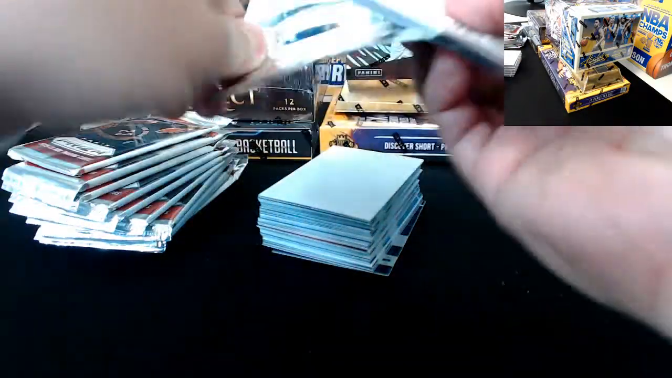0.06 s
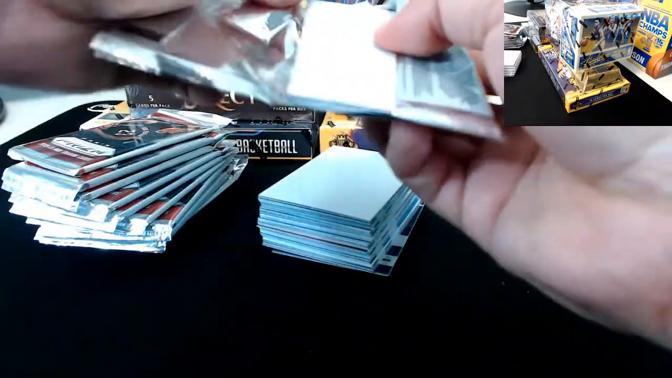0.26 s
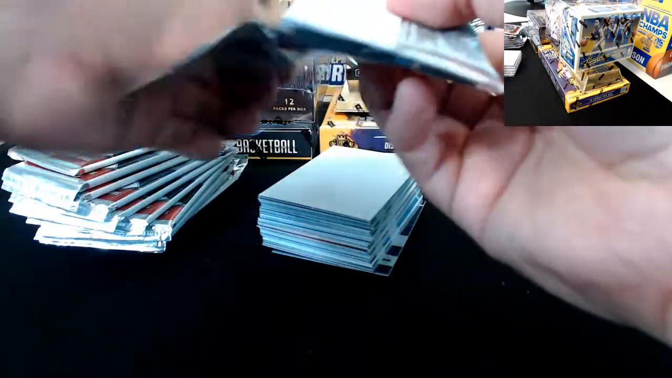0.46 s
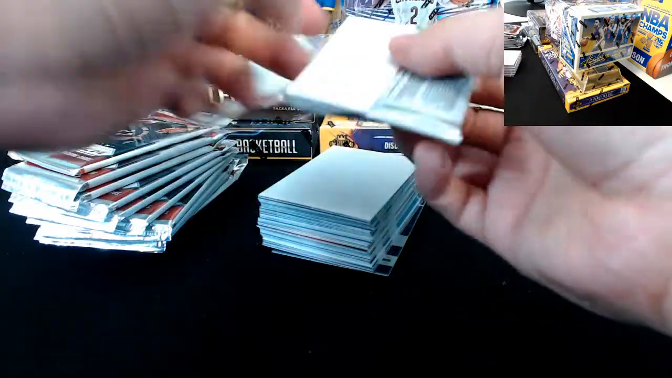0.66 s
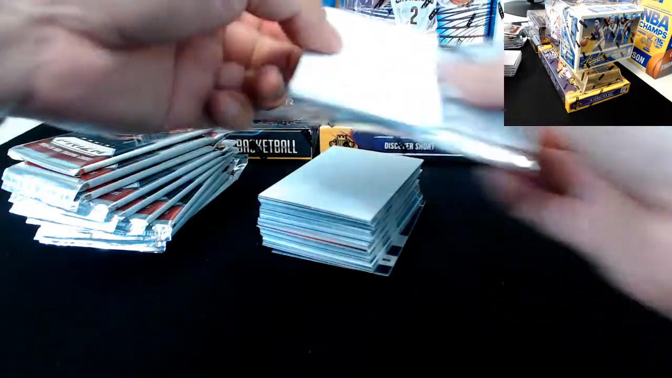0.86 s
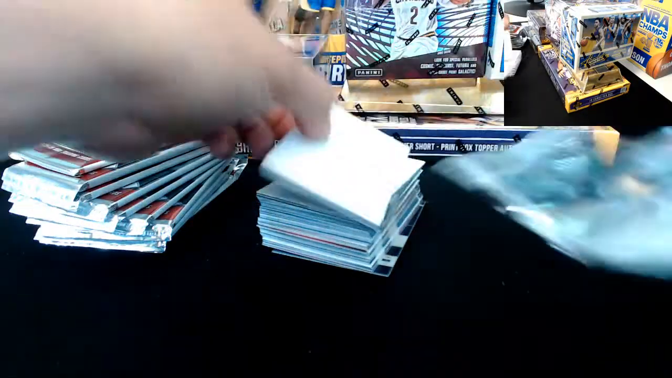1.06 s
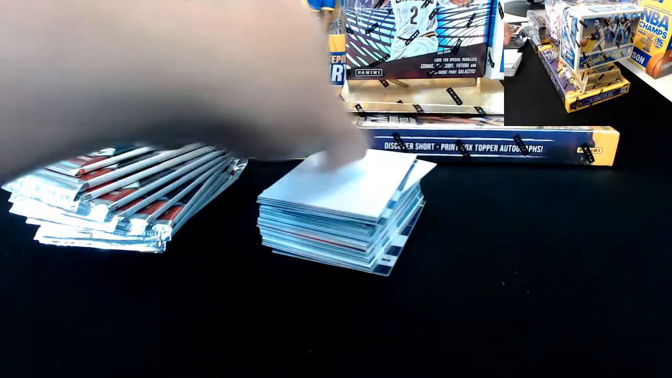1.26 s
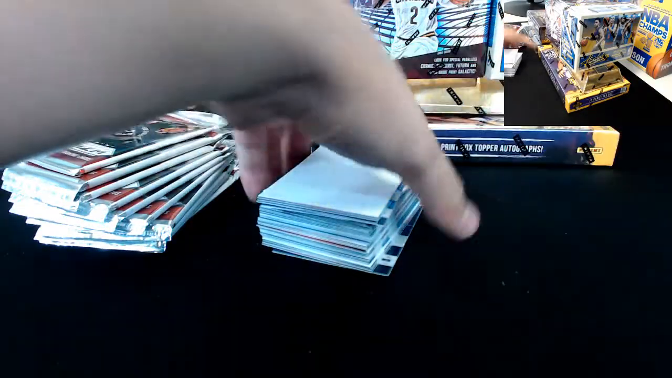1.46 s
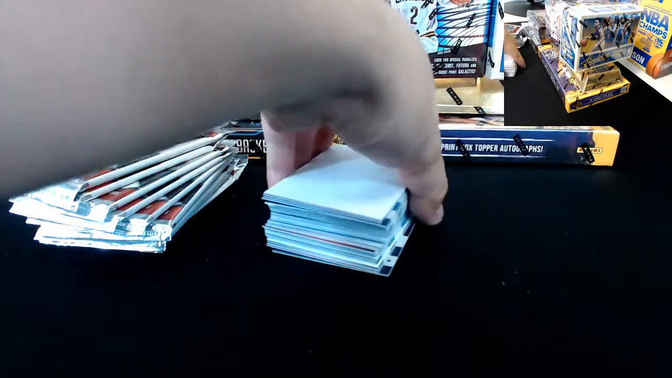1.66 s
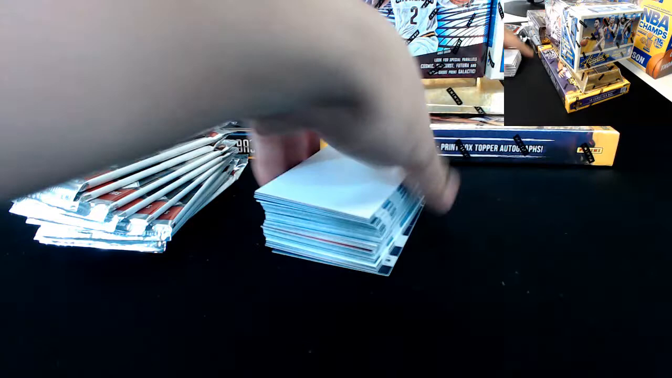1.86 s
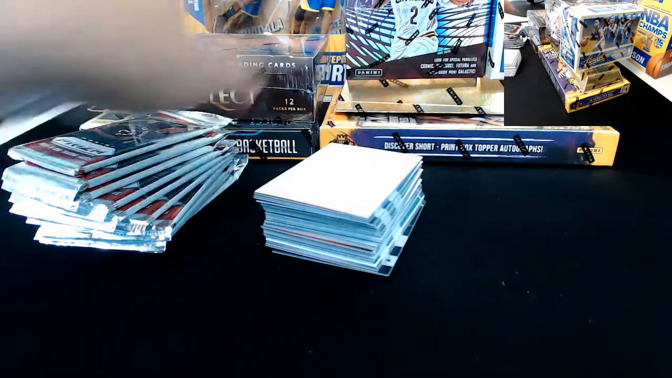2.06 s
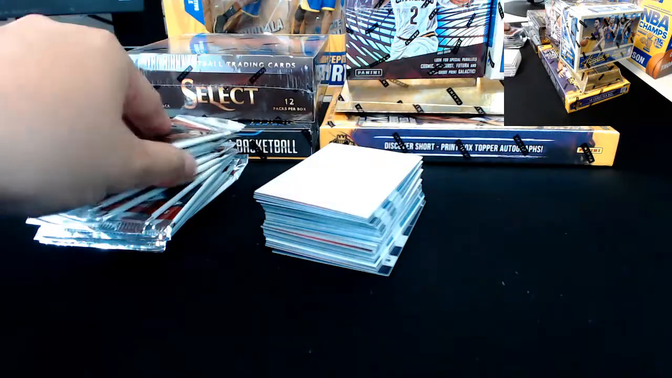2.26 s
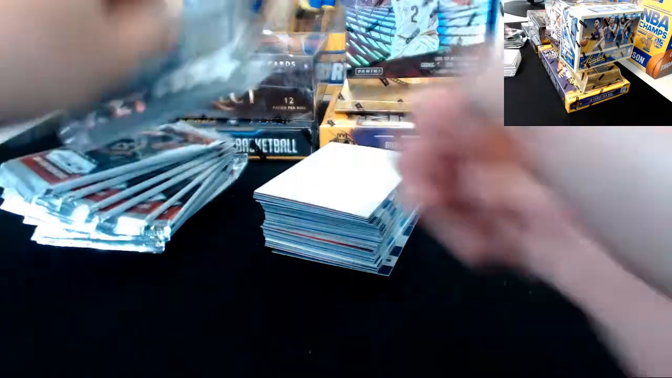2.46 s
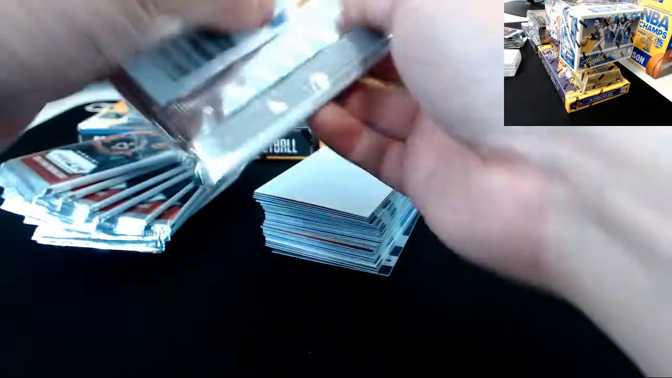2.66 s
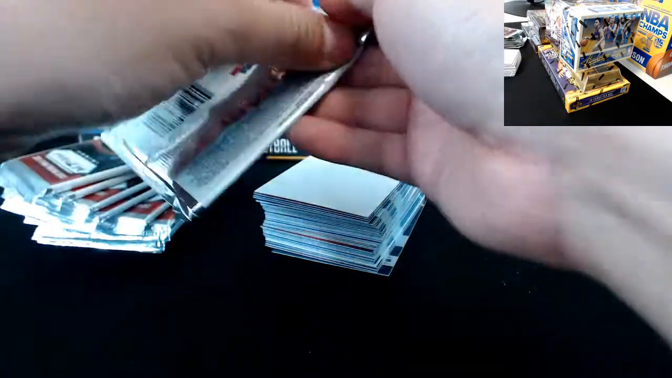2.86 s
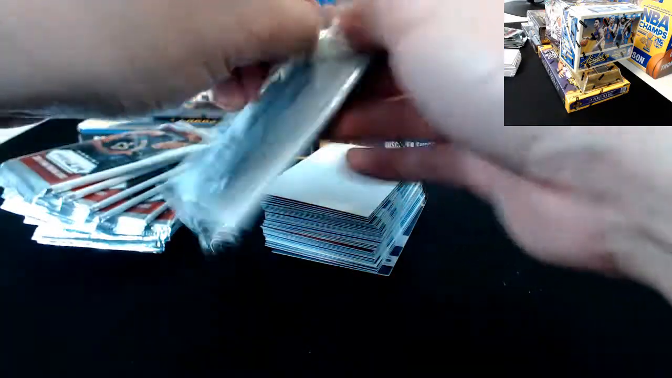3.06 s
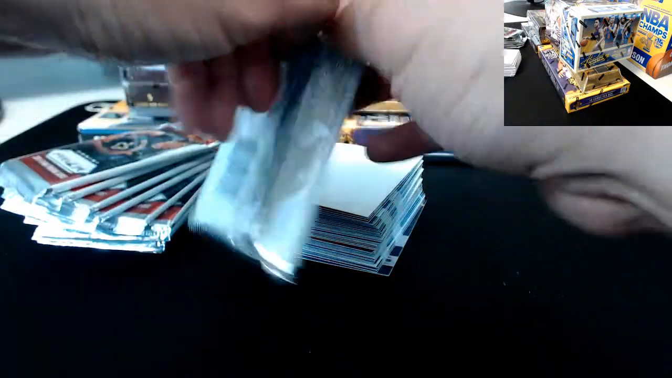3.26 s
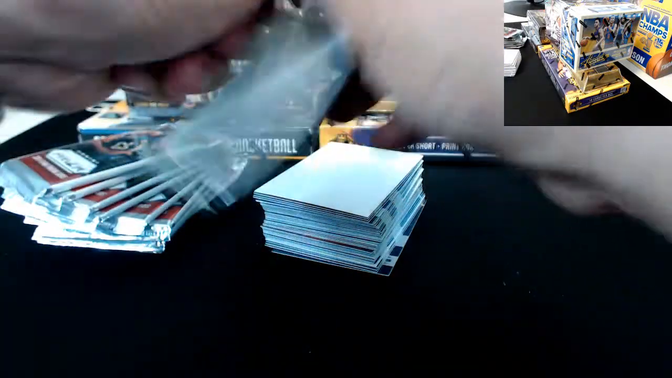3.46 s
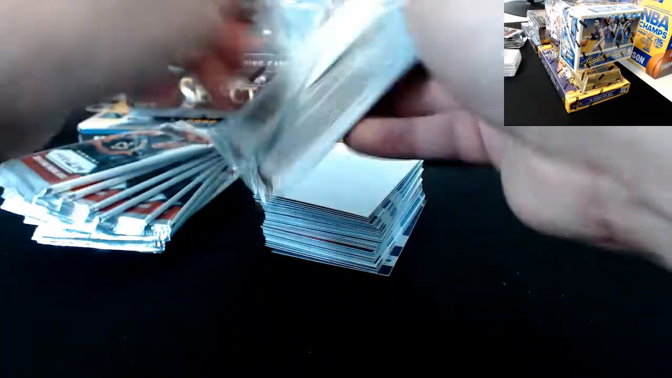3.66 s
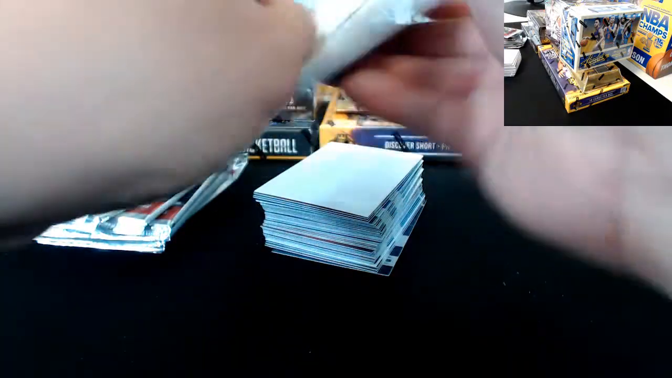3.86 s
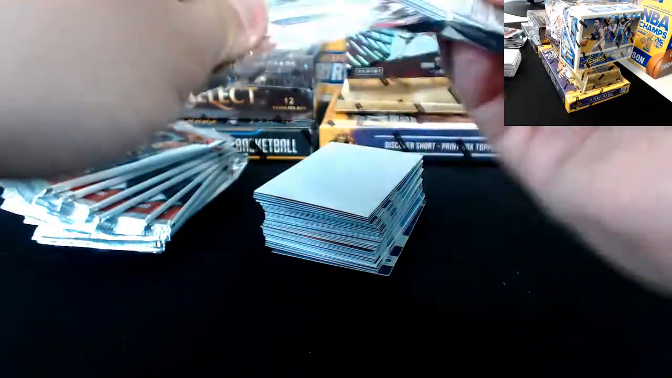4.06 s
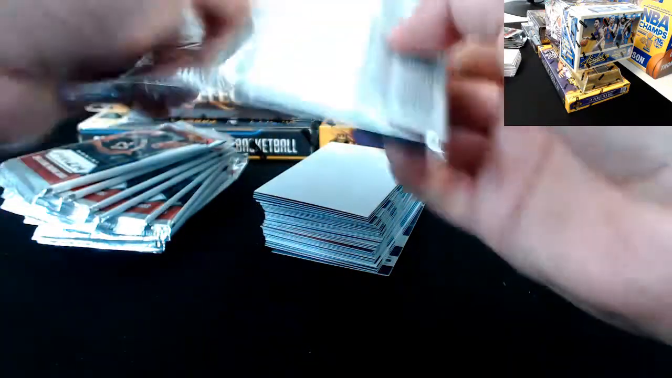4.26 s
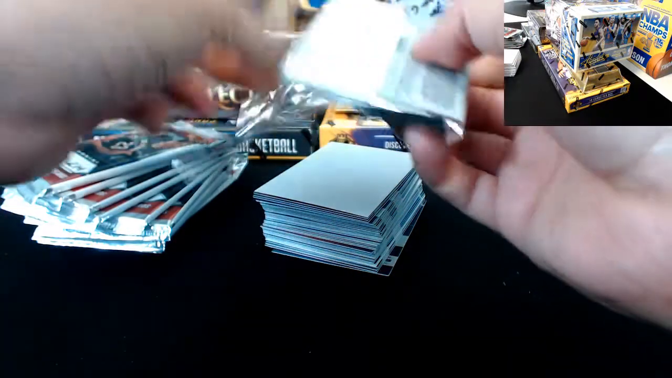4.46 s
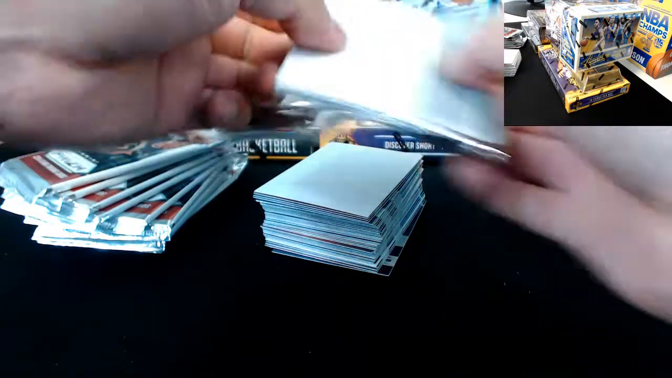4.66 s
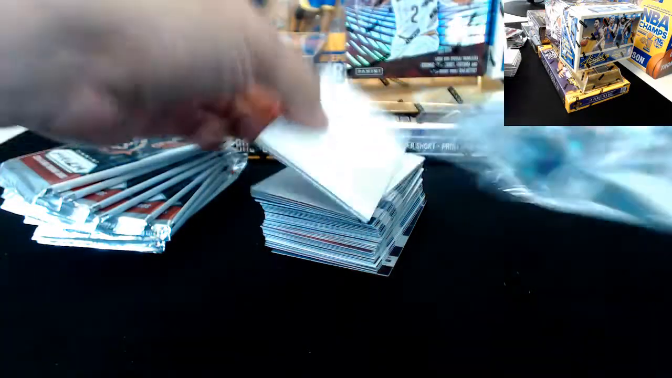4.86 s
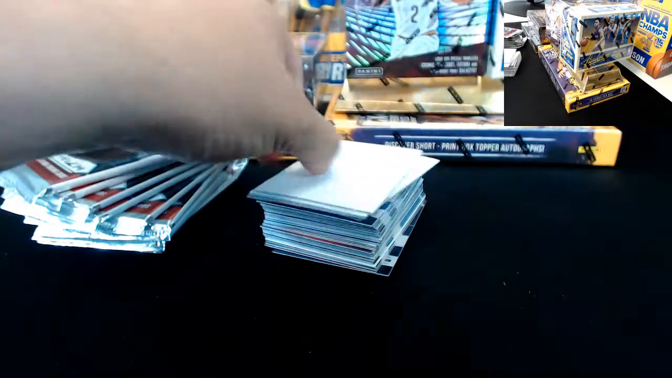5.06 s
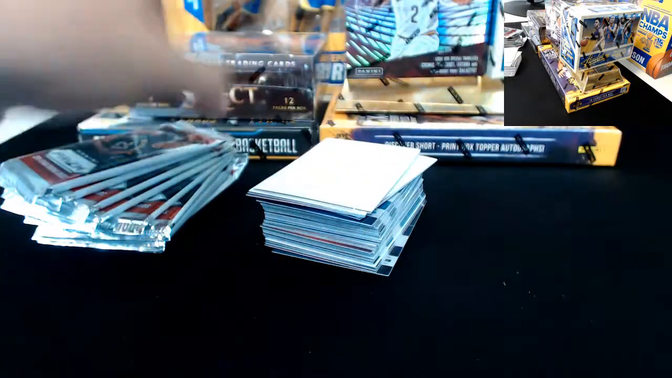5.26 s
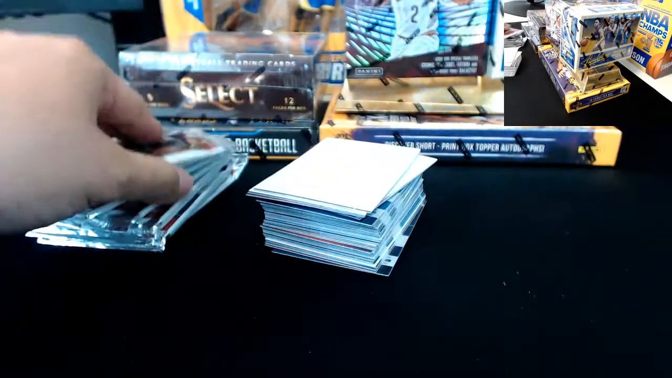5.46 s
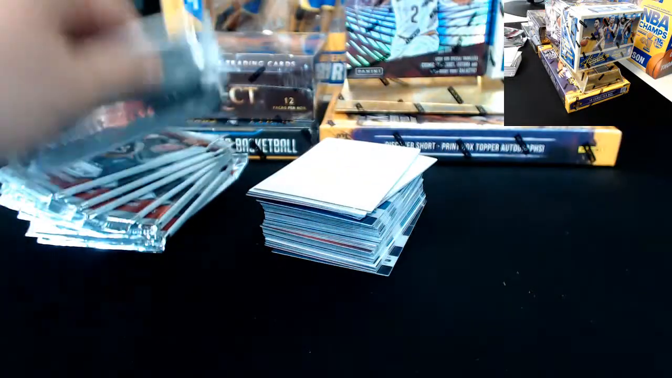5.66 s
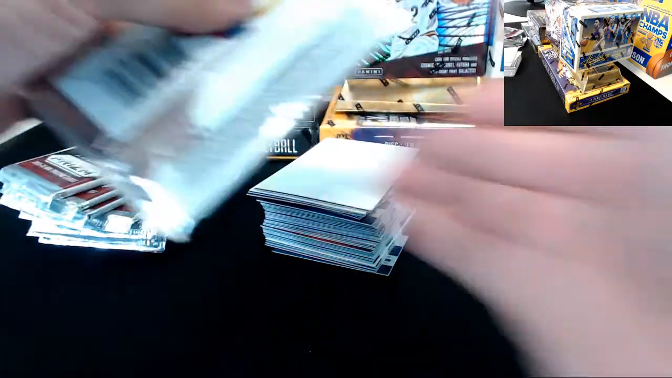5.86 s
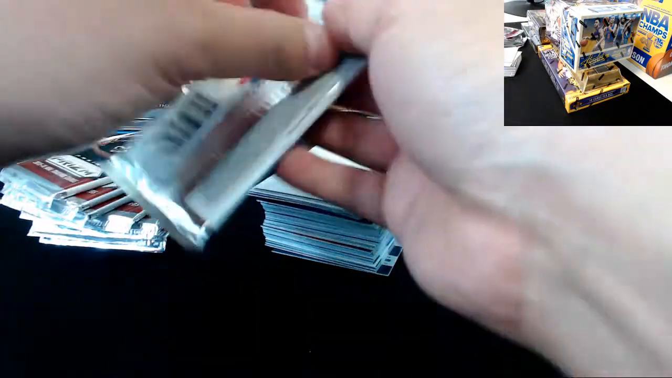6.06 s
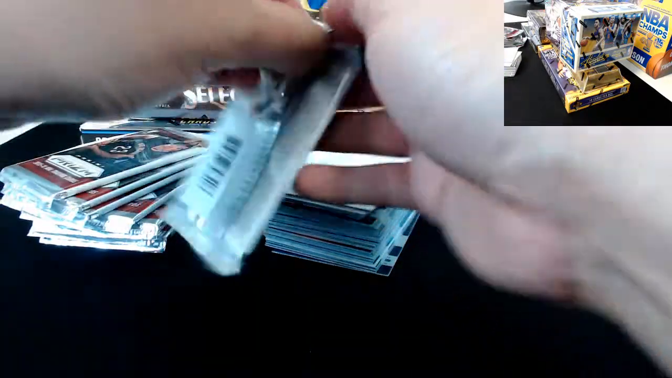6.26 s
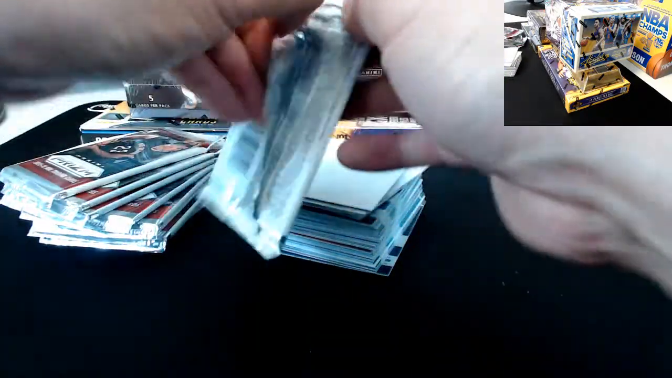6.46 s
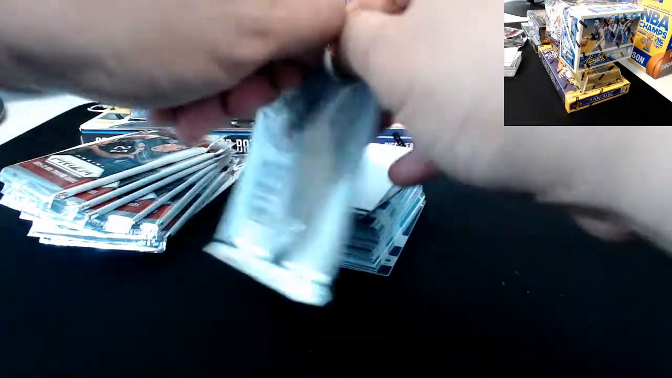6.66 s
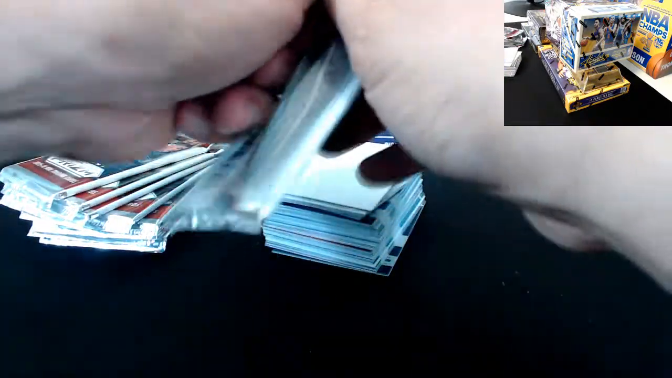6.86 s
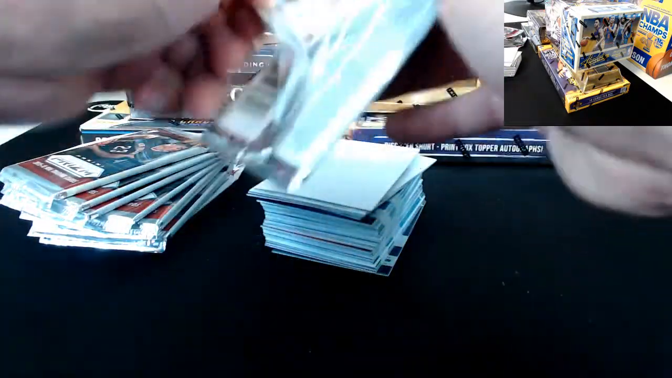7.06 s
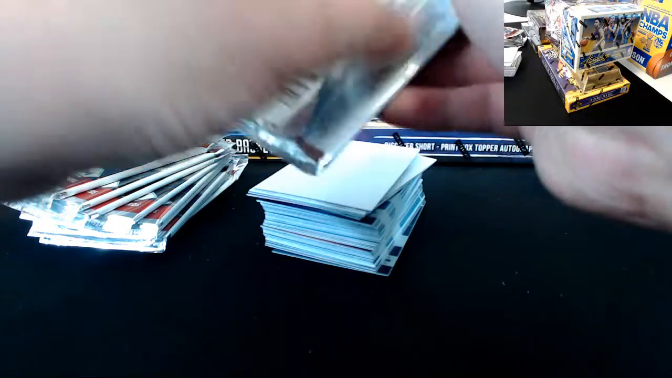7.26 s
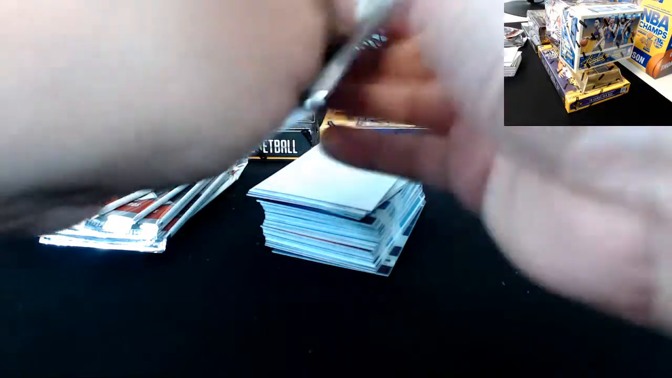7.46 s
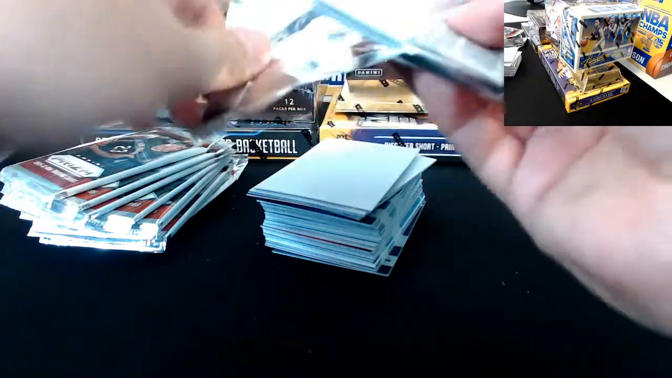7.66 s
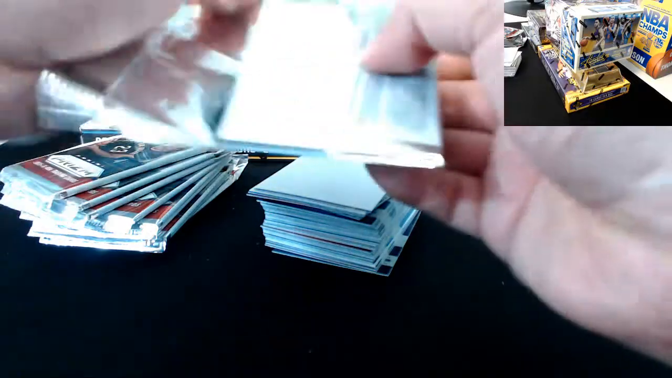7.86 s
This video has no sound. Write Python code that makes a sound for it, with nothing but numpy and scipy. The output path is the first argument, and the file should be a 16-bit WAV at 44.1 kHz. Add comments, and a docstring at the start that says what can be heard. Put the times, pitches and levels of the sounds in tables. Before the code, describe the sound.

Three bursts of bright, brittle foil handling fill a dry small room: one already underway, two more building to hard tearing snaps. In the gaps, card stock clicks dully and slides with fine grain, wrappers brush past with airy hiss, and leaning arms make a low table rumble. Mono, very close, over faint room noise and mains hum.

```python
"""Opening packs of cards

Foil packs of trading cards are handled and ripped open close to a small microphone on a table.
The foil snaps sharply over a fine crackle that thickens into rips: random clicks, coloured like foil.
Between packs, cards tap and slide onto a stack (dull clicks and fine grain), and wrappers brush by (hiss).
The table rumbles and thuds softly (low noise and fading tones). Nearby boxes and a small room answer
with short noisy tails, over low room rumble, microphone hiss and a faint mains hum."""
import sys
import numpy as np
from scipy import signal
from scipy.fft import rfft, irfft
from scipy.io import wavfile
from scipy.ndimage import uniform_filter1d

SR = 44100
rng = np.random.default_rng(int(sys.argv[2]) if len(sys.argv) > 2 else 0)


def persist_wave(psi):
    """Save psi, clipped to +-1, as 16-bit WAV."""
    counts = np.round(np.clip(psi, -1, 1) * 32767).astype(np.int16)
    wavfile.write(sys.argv[1], SR, np.atleast_2d(counts).T)


N = 348831  # length of the scene in samples
T = np.arange(N) / SR  # time of each sample in seconds

# In the event tables, levels are relative: the function that plays a table also sets its overall gain.
# In the spectrum tables, levels give only the shape: colour() evens out the total energy.


def undb(db):
    """Turn decibels into a gain."""
    return 10 ** (np.asarray(db) / 20)


def unit(x):
    """Scale a sound to unit energy."""
    return x / np.sqrt(np.sum(x ** 2) + 1e-18)


def fade(t, t60):
    """Die away exponentially, losing 60 dB in t60 seconds."""
    return np.exp(-np.log(1000) * t / t60)


def add(track, start_s, sound):
    """Mix a sound into the track, cutting it off where the track ends."""
    first = int(np.clip(start_s * SR, 0, N - 1))
    track[first:first + len(sound)] += sound[:N - first]


def through(x, response):
    """Pass a sound through an impulse response."""
    return signal.fftconvolve(x, response)[:N]


def colour(points, peaks=(), size=4096):
    """Build a unit-energy response with the given spectrum and resonances, starting at once (minimum phase)."""
    hz, db = np.transpose(points)
    f = np.maximum(np.fft.rfftfreq(size, 1 / SR), 1)
    gain = undb(np.interp(np.log(f), np.log(hz), db))
    for centre, width, peak_db in peaks:
        gain = gain * (1 + undb(peak_db) / (1 + (2 * (f - centre) / width) ** 2))
    # Folding the cepstrum moves all of the response to after time zero.
    cepstrum = irfft(np.log(gain))
    cepstrum[1:size // 2] *= 2
    cepstrum[size // 2 + 1:] = 0
    return unit(irfft(np.exp(rfft(cepstrum))))


def shimmer(x, t60):
    """Noise takes up the energy of x and dies away: a scatter that differs for every click."""
    keep = fade(1 / SR, t60) ** 2
    energy = signal.lfilter([1 - keep], [1, -keep], x ** 2)
    return rng.standard_normal(N) * np.sqrt(energy)


def radiate(drive, response, near_db=-3, near_t60=0.073):
    """Clicks scatter off hands, table and boxes, and take on the colour of the thing that made them."""
    scattered = undb(near_db) * shimmer(drive, near_t60)
    return through(drive + scattered, response)


def gestures(rows, attack_s, release_s):
    """A hand takes hold quickly, swells or eases steadily, and lets go: gains of the bright and low parts."""
    bright, low = np.zeros((2, N))
    for start_s, length_s, db, swell_db, *low_db in rows:
        t = T[T < length_s + release_s]
        gain = undb(db + swell_db * np.minimum(t / length_s, 1))
        gain = gain * np.minimum(t / attack_s, 1)
        gain = gain * fade(np.maximum(t - length_s, 0), release_s)
        add(bright, start_s, gain)
        add(low, start_s, gain * undb(sum(low_db)))
    return np.array([bright, low])


def click(hz, t60, ring, spread, rise_s=0.0016, count=5, size=900):
    """Something gives way: a noisy crack with a brief rattle, and a few tones scattered around hz."""
    t = T[:size]
    envelope = (1 - np.exp(-t / rise_s)) * fade(t, t60)
    crack = rng.standard_normal(size) * envelope
    facet_hz = hz * np.exp(spread * rng.standard_normal((count, 1)))
    facet_hz = np.clip(facet_hz, 300, SR / 3)
    strengths = rng.standard_normal((count, 1))
    facets = np.sin(2 * np.pi * facet_hz * t) * strengths * envelope
    return unit(unit(crack) + ring * unit(facets.sum(axis=0)))


def blows(rows, t60, ring):
    """Each click drives the bright part and also jerks the body, which takes twice as long to settle."""
    bright, low = np.zeros((2, N))
    for start_s, db, hz, *low_db in rows:
        add(bright, start_s, undb(db) * click(hz, t60, ring, spread=0.3))
        body_db = db + sum(low_db)
        add(low, start_s, undb(body_db) * click(900, 2 * t60, ring=0.16, spread=0.6))
    return bright, low


def crackle(per_s, scatter_db, bunch_db, t60=0.0059, size=600):
    """Random tiny snaps vary in size and come in bunches, each rattling briefly; mean level stays near 1."""
    knots = np.arange(0, N, size)
    bunches = np.interp(np.arange(N), knots, rng.standard_normal(len(knots)))
    sizes = undb(scatter_db * np.minimum(rng.standard_normal(N), 2) + bunch_db * bunches)
    strikes = (rng.random(N) < per_s / SR) * sizes
    recent_power = uniform_filter1d(strikes ** 2, SR // 20)
    strikes = strikes / np.sqrt(np.maximum(recent_power, 1e-12))
    return shimmer(strikes, t60)


# spectrum of the steady background noise: (frequency [Hz], level [dB])
BACKGROUND_SPECTRUM = [(12, -29.5), (20, -1), (120, -11), (193, -15), (434, -19.5), (513, -18), (607, -20),
                       (1060, -27), (5680, -31), (7310, -34), (9950, -36), (13200, -38.5), (16000, -65)]
# tones of the mains hum: (frequency [Hz], rms level [dB])
MAINS_HUM = [(60, -92.5), (120, -83), (180, -99)]


def background(noise_db=-76.5):
    """Low room rumble and microphone hiss are coloured noise; mains hum is a few steady tones."""
    noise = undb(noise_db) * through(rng.standard_normal(N), colour(BACKGROUND_SPECTRUM))
    hum = sum(np.sqrt(2) * undb(db) * np.sin(2 * np.pi * hz * T) for hz, db in MAINS_HUM)
    return noise + hum


# bands that swell and sink as the foil bends: (centre frequency [Hz])
FACET_BANDS_HZ = [600, 900, 1400, 2200, 3200, 4200, 5400, 6600, 8000, 9600, 11500, 14000]


def flex(x, depth_db=7.5, shapes_per_s=70):
    """The foil keeps changing shape, so overlapping bands swell and sink, each with unit mean power gain."""
    spectrum, f = rfft(x), np.fft.rfftfreq(N, 1 / SR)
    knots = np.arange(0, N, SR // shapes_per_s)
    out = np.zeros(N)
    for weights in np.eye(len(FACET_BANDS_HZ)):  # each round picks out one band
        band = irfft(spectrum * np.interp(f, FACET_BANDS_HZ, weights), N)
        swing = np.interp(np.arange(N), knots, rng.uniform(-1, 1, len(knots)))
        gain = undb(depth_db * swing)
        out += band * gain / np.sqrt(np.mean(gain ** 2))
    return out


# foil crumpled in the fingers: (start [s], length [s], level [dB], swell over the length [dB])
CRINKLES = [(0.0, 0.098, -54, -0.5), (.165, 0.093, -51, -0.5), (.31, 0.24, -54, -5),
            (.615, 0.18, -64.5, -14), (.785, 0.14, -65, 1.5), (.94, 0.084, -73, -0.5),
            (2.615, 0.23, -74.5, 12), (2.87, 0.084, -64, 11), (3.115, 0.18, -60, 0), (3.32, 0.15, -74, 14),
            (3.52, 0.14, -65, 5.5), (3.625, 0.022, -51, -11), (3.7, 0.25, -68.5, -2.5),
            (4.04, .32, -56, 0.5), (4.37, 0.049, -73, 9.5), (4.47, 0.15, -75.5, 7), (4.56, 0.035, -64, -3),
            (4.63, 0.17, -69.5, 3.5), (5.91, .21, -65.5, 6.5), (6.19, 0.11, -68.5, 13),
            (6.43, 0.26, -59, -5), (6.7, 0.13, -74, 11), (6.96, 0.12, -70.5, 15), (7.1, 0.16, -54.5, -18.5),
            (7.27, 0.1, -75.5, 6), (7.455, 0.017, -64, 3), (7.58, 0.11, -53.5, 2.5),
            (7.772, 0.01, -56, 2.5), (7.8, 0.07, -52, 0)]
# seams ripped and wrappers pulled wide:
# (start [s], length [s], level [dB], swell [dB], sheet relative to crackle [dB])
RIPS = [(2.98, 0.061, -48, 6.5, -19), (3.438, 0.043, -30, -22.5, -15), (3.47, 0.037, -41.5, 9.5, -13.5),
        (3.932, 0.092, -52, 24, -8), (6.275, 0.059, -48, 8.5, -21), (6.863, 0.072, -36.5, 0.5, -17.5),
        (7.048, 0.034, -44, 3.5, -24), (7.476, 0.024, -54, 13, -15), (7.504, 0.049, -44.5, 20, -6.5)]
# the loudest creases snapping through: (time [s], level [dB], ring of the facet [Hz])
SNAPS = [(.0894, -31, 7600), (.161, -38, 6860), (.2234, -33.5, 7400), (.2794, -35, 7600),
         (.2875, -30.5, 7680), (.3306, -40, 4300), (.3526, -52, 6860), (.403, -37.5, 7000),
         (.4843, -44, 4200), (.5242, -53, 4970), (.5585, -41.5, 6200), (.6218, -47, 7150),
         (.6864, -44.5, 6700), (.7908, -49, 5400), (.857, -52, 6400), (.913, -58, 7700),
         (2.6309, -45, 4800), (2.6529, -42.5, 6420), (2.7295, -38, 9060), (2.789, -41, 5460),
         (2.835, -36, 6400), (2.8813, -44.5, 4230), (2.9215, -52, 7300), (2.9619, -41, 5300),
         (3.1163, -43, 6950), (3.1642, -41, 6430), (3.2024, -50, 7850), (3.2173, -37.5, 4440),
         (3.254, -32.5, 7400), (3.265, -31, 4040), (3.3463, -47, 7500), (3.4087, -38.5, 7760),
         (3.4405, -20, 5210), (3.483, -21.5, 2740), (3.4994, -25.5, 7000), (3.6447, -39, 6000),
         (3.6769, -37.5, 5500), (3.7718, -52.5, 6240), (3.7826, -40.5, 7200), (3.8125, -38.5, 5650),
         (3.8658, -43, 5930), (3.931, -39, 9600), (3.97, -24.5, 7000), (4.0165, -21, 7430),
         (4.0203, -20.5, 4430), (4.0824, -31, 3520), (4.104, -39, 4310), (4.2042, -52, 5600),
         (4.1721, -36.5, 6140), (4.2149, -31.5, 2990), (4.276, -28, 5150), (4.306, -35, 3920),
         (4.331, -34.5, 6860), (4.416, -38.5, 4080), (4.4759, -49, 7800), (4.5595, -37, 7530),
         (4.5671, -37, 5400), (4.6485, -47, 5300), (4.7032, -56, 6500), (4.7918, -53.5, 6170),
         (4.869, -56, 7070), (4.9304, -49, 8100), (5.9514, -38, 7550), (5.9604, -40, 13400),
         (6.0217, -42, 7440), (6.0394, -39, 7250), (6.0846, -37, 5000), (6.119, -40.5, 3370),
         (6.1878, -37.5, 6200), (6.205, -37, 9450), (6.2577, -43, 5940), (6.3165, -33.5, 9300),
         (6.351, -29.5, 3260), (6.4165, -36.5, 8300), (6.4553, -41.5, 6840), (6.4814, -36, 7500),
         (6.4873, -35.5, 5470), (6.5082, -35.5, 6260), (6.5925, -40, 7700), (6.614, -38, 7900),
         (6.6645, -45, 6700), (6.7052, -34, 6600), (6.8648, -19.5, 11300), (7.1327, -37, 2380),
         (7.1729, -47, 6500), (7.218, -43.5, 4300), (7.3665, -35.5, 7640), (7.5035, -22, 7550),
         (7.5104, -29, 5300), (7.5432, -26, 6930), (7.5527, -39, 4280), (7.6323, -26.5, 8330),
         (7.7045, -42, 4000), (7.8014, -35.5, 5550), (7.8482, -35, 5780)]
# how freely the whole sheet rings, low while pinched taut at the seam and high once it hangs slack:
# (time [s], sheet level [dB])
SLACK = [(0.0, -5.5), (1.0, -2), (2.72, -5.5), (2.82, -16), (3.26, -20), (3.48, -8.5), (3.9, -7.5),
         (4.05, -6.5), (4.85, -3.5), (5.95, -4.5), (6.2, -18.5), (6.6, -11.5), (6.72, -9), (7.15, -5),
         (7.5, -7.5), (7.9, -1.5)]
# spectrum of the crackling creases: (frequency [Hz], level [dB])
FOIL_SPECTRUM = [(900, -40), (1900, -12), (2520, -4), (3200, -3.5), (4200, -2), (5200, -1.5), (6800, 0),
                 (8500, -2), (10600, -6.5), (12000, -4.5), (16000, -14)]
# spectrum of the whole sheet: (frequency [Hz], level [dB])
SHEET_SPECTRUM = [(40, -39.5), (150, -15.5), (290, -9), (420, -2.5), (700, -2), (1100, 1), (1600, -4.5),
                  (2100, -5), (4000, -32.5)]
# hollows of the wrapper and cupped hands: (frequency [Hz], width [Hz], added gain [dB])
HOLLOWS = [(525, 13, -19), (517, 35, -3), (697, 240, 0), (776, 130, -4), (1290, 26, -3.5), (1506, 88, 2.5),
           (1655, 30, -7)]


def foil(snap_db=15.5, snap_sheet_db=10.5, crinkle_db=0.5, crinkle_sheet_db=-2.0, rip_db=-1, rip_sheet_db=1):
    """Creases crackle in the treble and also jerk the whole sheet, which rings more when it is slack."""
    snap, snap_low = blows(SNAPS, t60=0.0089, ring=0.4)
    sparse = crackle(per_s=620, scatter_db=7, bunch_db=1.5)
    crinkle = gestures(CRINKLES, attack_s=0.0028, release_s=0.13)[0] * sparse
    dense = crackle(per_s=1900, scatter_db=4, bunch_db=1)
    rip, rip_low = gestures(RIPS, attack_s=0.005, release_s=0.03) * dense

    creases = undb(snap_db) * snap + undb(crinkle_db) * crinkle + undb(rip_db) * rip
    slack = undb(np.interp(T, *np.transpose(SLACK)))
    sheet = slack * (undb(snap_sheet_db) * snap_low + undb(crinkle_sheet_db) * crinkle)
    sheet = sheet + undb(rip_sheet_db) * rip_low
    wrapper = radiate(creases, colour(FOIL_SPECTRUM)) + radiate(sheet, colour(SHEET_SPECTRUM, HOLLOWS))
    return flex(wrapper)


def room(x, tail_db=-10, tail_t60=0.21):
    """A small furnished room adds a short, duller tail of fading noise."""
    t = T[:SR // 2]
    tail = rng.standard_normal(len(t)) * fade(t, tail_t60) * (t > 0.006)  # starts after 6 ms
    tail = through(tail, colour([(200, -1.5), (5000, -2.5), (15000, -4.0)]))
    return x + undb(tail_db) * through(x, unit(tail))


# an arm leans on the table and eases off: (start [s], length [s], level [dB], swell [dB])
LEANING = [(1.0, 0.061, -68, 2), (1.13, 0.99, -59, -18), (4.82, 0.071, -67, -1.5), (4.95, 0.46, -67, 2),
           (5.5, 0.41, -69.5, -2.5)]
# spectrum of the table's rumble: (frequency [Hz], level [dB])
RUMBLE_SPECTRUM = [(12, -31.5), (22, -3), (38, 9.5), (55, -17), (76, 1.5), (97, -10.5), (115, -6),
                   (150, -22.5), (250, -31.5), (600, -42.5)]
# knocks passed on to the table: (time [s], level [dB])
THUDS = [(1.149, -57.5), (1.549, -62), (3.437, -57), (4.018, -61), (4.96, -58), (6.864, -60)]
# ways the table can wobble: (frequency [Hz], level [dB], time to fade by 60 dB [s])
TABLE_MODES = [(24, 1, 0.45), (34.4, 3, .9), (54.2, -1, .35), (79.8, 4.5, 0.25), (112, -1, 0.27),
               (191, 1, 0.1), (257, -4.5, 0.91)]


def table(thud_db=-13, rumble_db=-1):
    """Leaning arms make the table rumble; knocks set it wobbling at several low pitches."""
    thuds, t = np.zeros(N), T[:SR]
    for start_s, db in THUDS:
        for hz, mode_db, t60 in TABLE_MODES:
            pitch = hz * (1 + 0.025 * rng.standard_normal())  # slightly different at each knock
            wobble = np.sin(2 * np.pi * pitch * t) * fade(t, t60) * rng.choice([-1, 1])
            add(thuds, start_s, undb(db + mode_db + thud_db) * wobble)
    rumble = through(rng.standard_normal(N), colour(RUMBLE_SPECTRUM))
    leaning = gestures(LEANING, attack_s=0.017, release_s=0.74)[0]
    return thuds + undb(rumble_db) * leaning * rumble


# card edges and packs tapping their stacks:
# (time [s], level [dB], ring [Hz], body relative to the tap [dB])
TAPS = [(1.0155, -39, 2400, -17.5), (1.074, -53, 3470, -35), (1.1431, -50, 1780, 6),
        (1.4158, -34, 2920, -14.5), (1.475, -52, 5800, -22), (1.5459, -34, 3480, -9.5),
        (1.558, -36.5, 2500, -9.5), (1.6533, -46.5, 4550, -33), (1.8003, -53, 2130, -0.5),
        (2.492, -55, 5370, -28), (4.9622, -63.5, 1500, 10.5), (5.2051, -50, 2640, -12),
        (5.2597, -31, 4400, -15), (5.3166, -36.5, 3880, -29), (5.3369, -37, 2550, -12.5),
        (5.3917, -44, 3530, -34)]
# cards sliding onto their stack:
# (start [s], length [s], level [dB], swell [dB], body relative to the hiss [dB])
SLIDES = [(1.118, 0.0089, -54, -14, -16), (1.326, 0.033, -57.5, -5, -6), (1.52, 0.034, -66, 19, -11),
          (1.56, 0.054, -62.5, -3.5, -10), (1.655, 0.012, -58, -5.5, -12), (1.797, 0.031, -63, 0, -8),
          (5.315, 0.051, -52.5, -12, -26), (5.39, 0.041, -56.5, -4.5, -9), (5.59, 0.045, -61.5, -4.5, -14)]
# skin and wrappers brushing over the pile of packs: (start [s], length [s], level [dB], swell [dB])
BRUSHES = [(2.12, 0.3, -69, -4), (2.42, 0.37, -82, 9), (4.96, .28, -83, 10.5), (5.64, 0.33, -77.5, 4)]
# spectrum of tapping card edges: (frequency [Hz], level [dB])
CARD_SPECTRUM = [(600, -6), (1500, -2.5), (3000, 0), (4500, -1), (7000, -4), (10000, -11.5), (16000, -12.5)]
# spectrum of card sliding on card: (frequency [Hz], level [dB])
SLIDE_SPECTRUM = [(600, -12), (1500, -0.5), (3000, -1.5), (4500, -2), (7000, -0.5), (10000, -8.5),
                  (13000, -9.5), (16000, -15.5)]
# spectrum of the body of cards and stacks: (frequency [Hz], level [dB])
BODY_SPECTRUM = [(50, -11), (130, -3), (220, 10.5), (310, 1.5), (450, 2.5), (750, 3.5), (1400, -7.5),
                 (2200, -18), (4000, -22)]
# spectrum of the brushing hiss: (frequency [Hz], level [dB])
BRUSH_SPECTRUM = [(200, -8), (700, -2), (2000, -1), (4500, -0.5), (7000, 3), (10000, -0.5), (16000, -12)]


def cards(tap_db=10.0, tap_body_db=15.0, slide_db=-4.0, slide_body_db=-3, brush_db=-1):
    """Card stock taps dully and slides with a fine, even grain; brushing is a smooth hiss."""
    tap, tap_low = blows(TAPS, t60=0.0043, ring=0.22)
    grain = crackle(per_s=4500, scatter_db=4, bunch_db=5.0)
    slide, slide_low = gestures(SLIDES, attack_s=0.005, release_s=0.078) * grain
    hiss = crackle(per_s=7400, scatter_db=3.5, bunch_db=3.5)
    brush = gestures(BRUSHES, attack_s=0.036, release_s=0.06)[0] * hiss

    edge = undb(tap_db) * radiate(tap, colour(CARD_SPECTRUM))
    edge = edge + undb(slide_db) * radiate(slide, colour(SLIDE_SPECTRUM))
    body_drive = undb(tap_body_db) * tap_low + undb(slide_body_db) * slide_low
    body = radiate(body_drive, colour(BODY_SPECTRUM))
    return edge + body + undb(brush_db) * through(brush, colour(BRUSH_SPECTRUM))


def scene():
    """Mix everything at the table in mono; foil and cards also sound in the room."""
    handling = room(foil() + cards())
    return (handling + table() + background())[None]


def record(dry, top_hz=16000):
    """The microphone cuts the top with a steep low-pass filter."""
    return signal.sosfilt(signal.ellip(10, 0.2, 70, top_hz, fs=SR, output="sos"), dry)


dry = scene()
out = record(dry)
persist_wave(out)
```